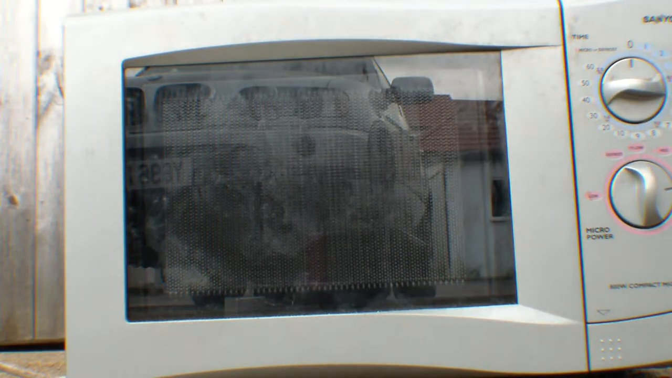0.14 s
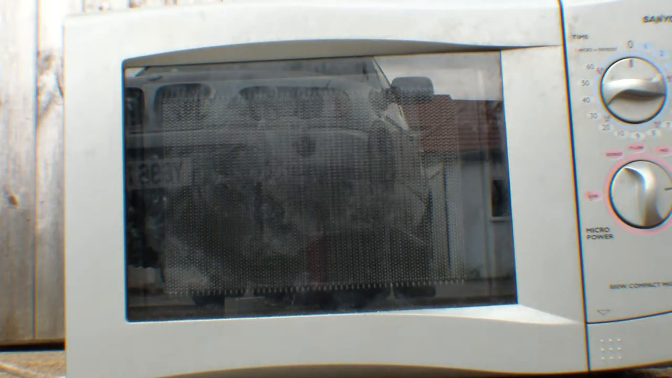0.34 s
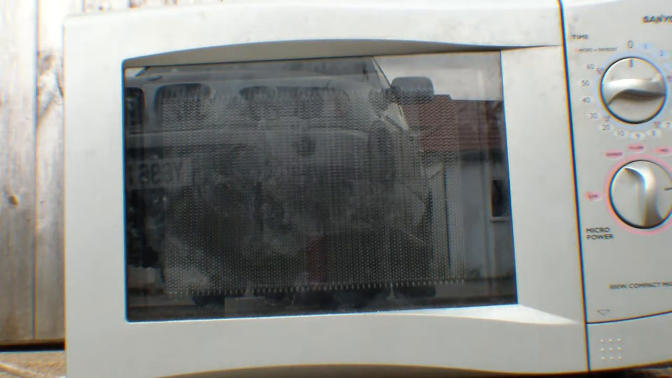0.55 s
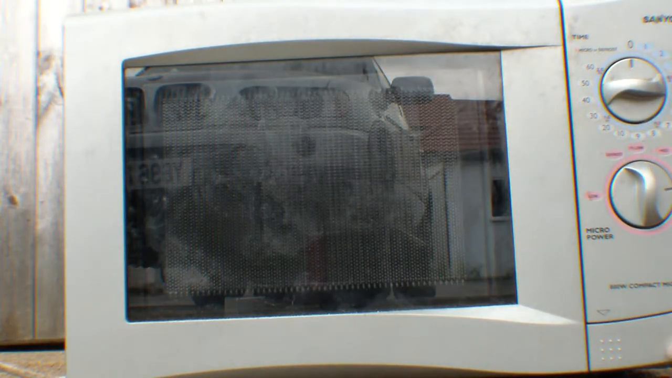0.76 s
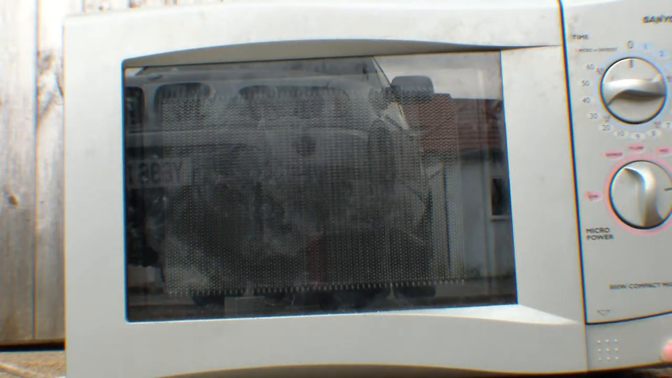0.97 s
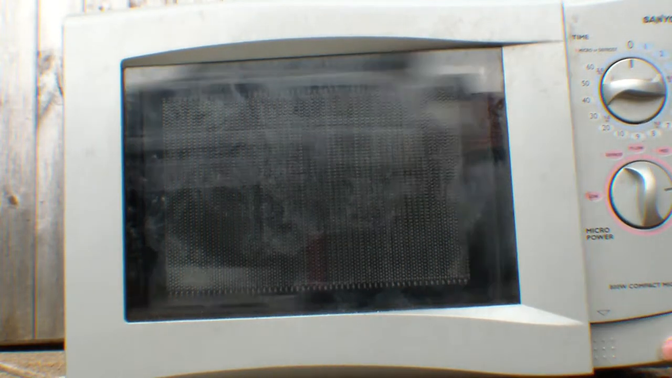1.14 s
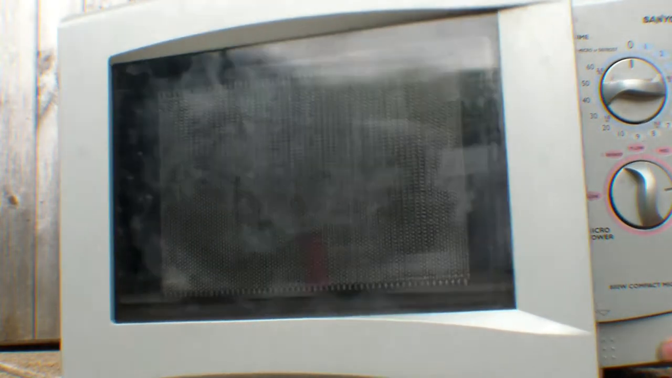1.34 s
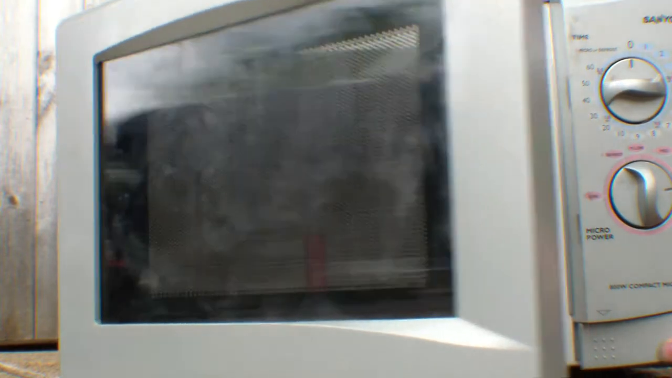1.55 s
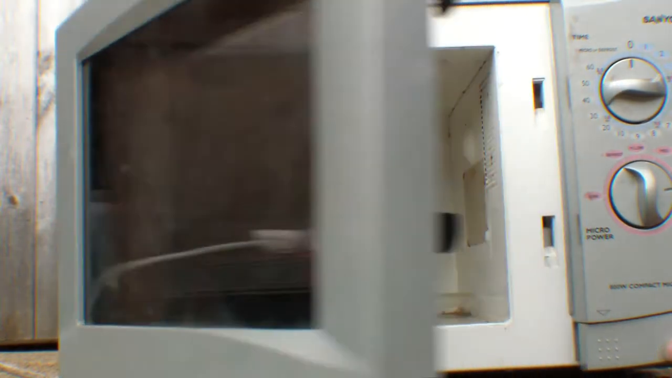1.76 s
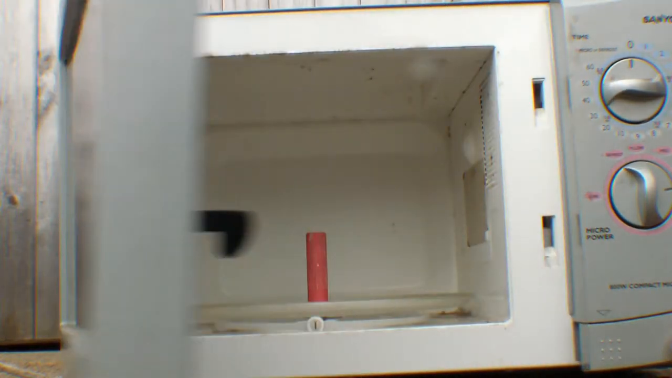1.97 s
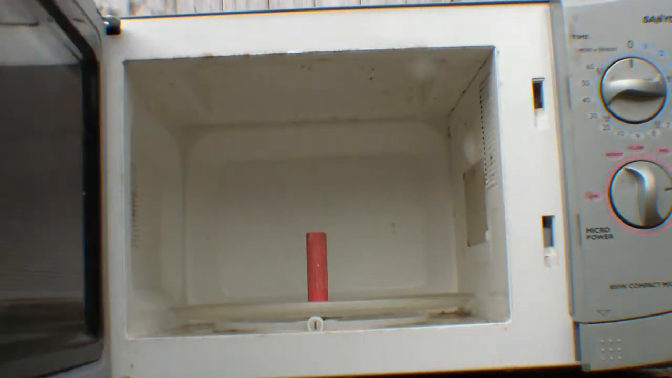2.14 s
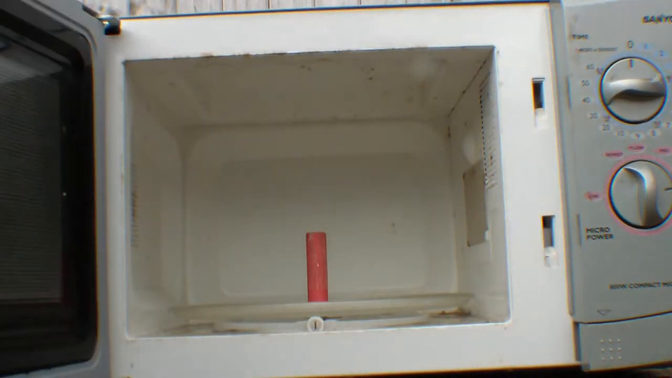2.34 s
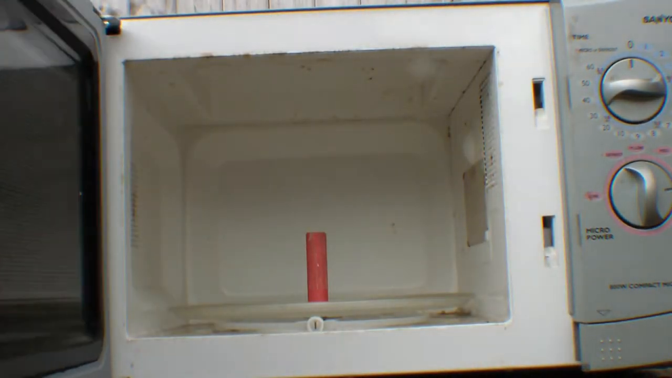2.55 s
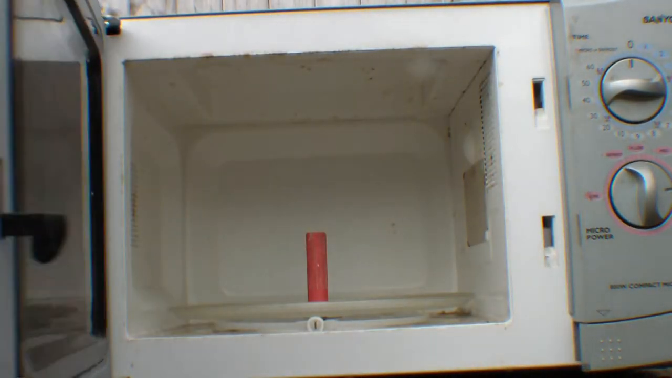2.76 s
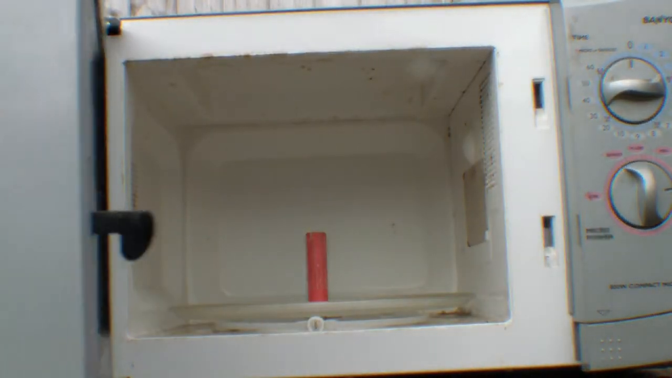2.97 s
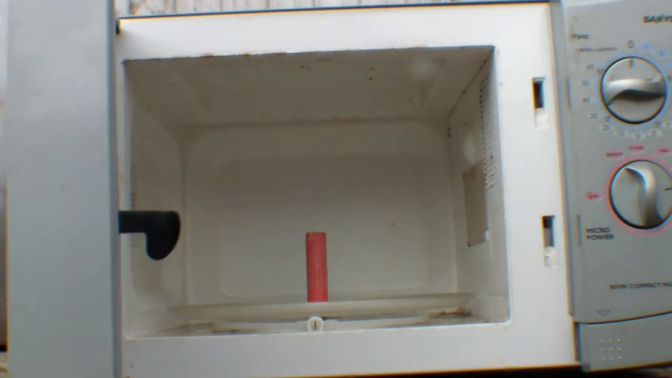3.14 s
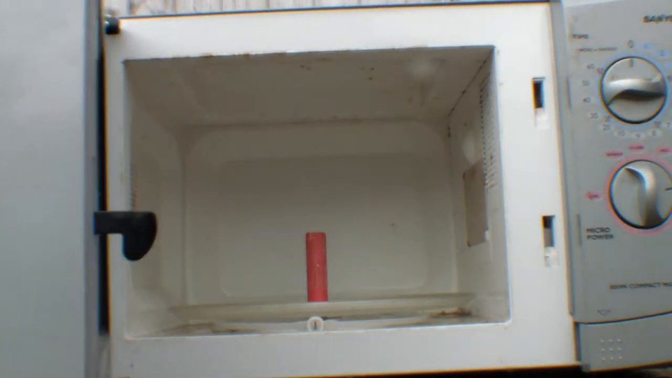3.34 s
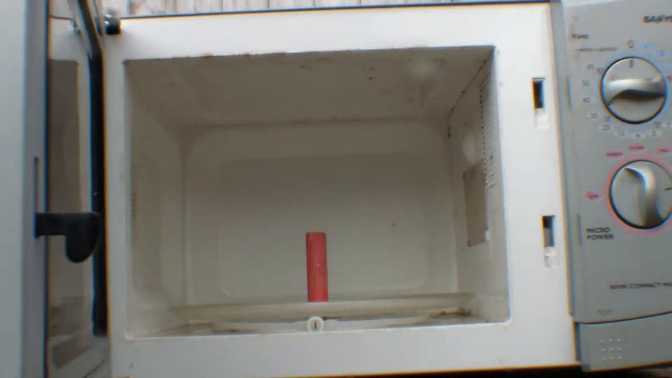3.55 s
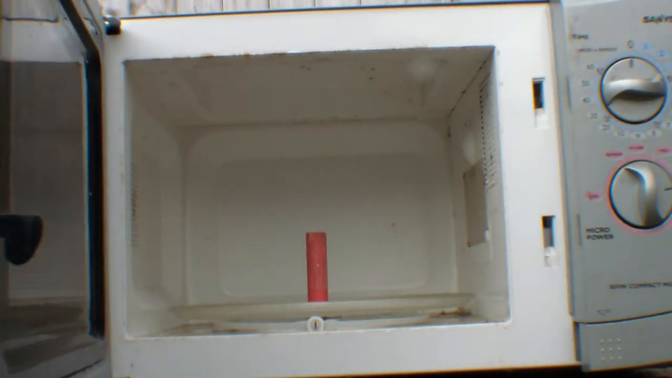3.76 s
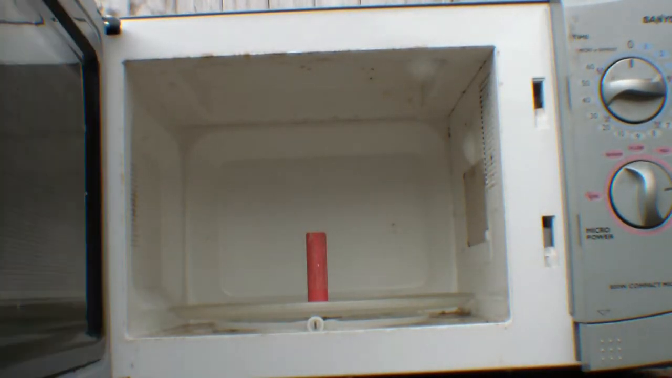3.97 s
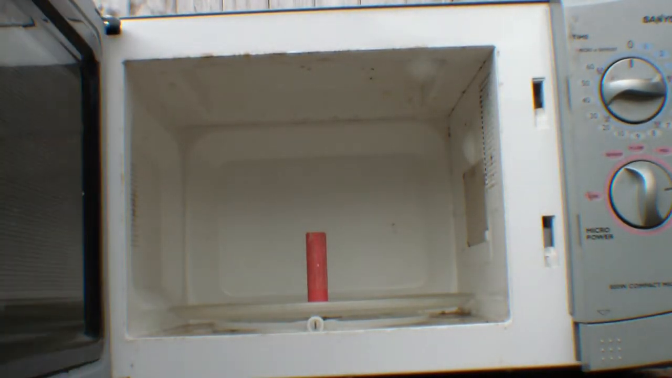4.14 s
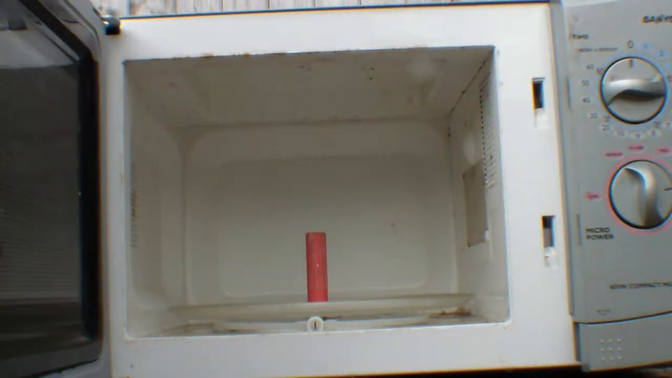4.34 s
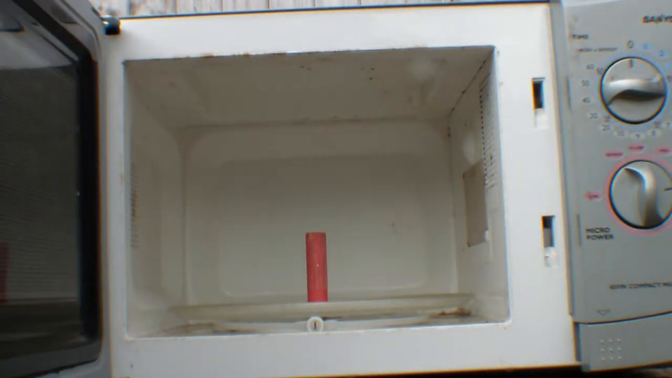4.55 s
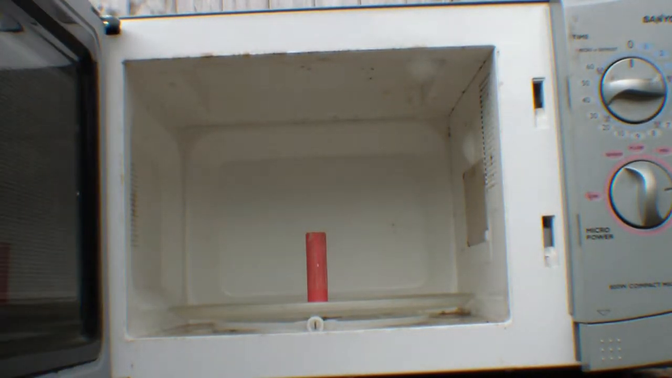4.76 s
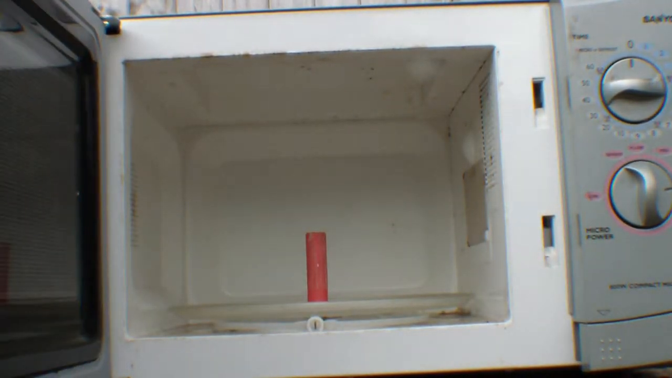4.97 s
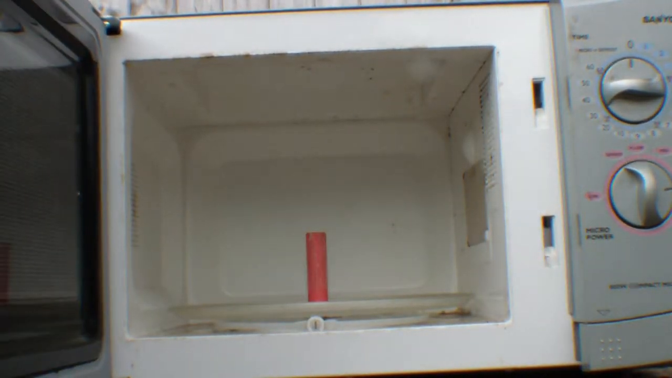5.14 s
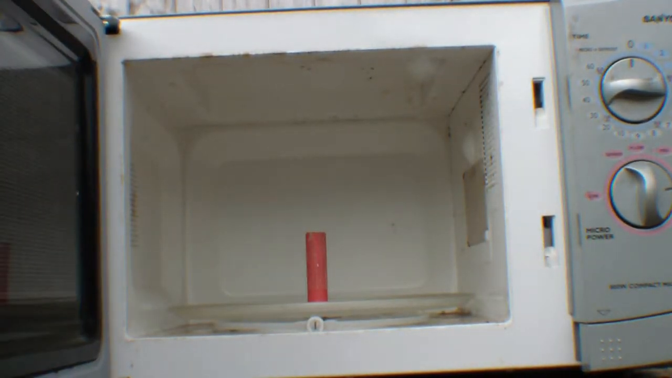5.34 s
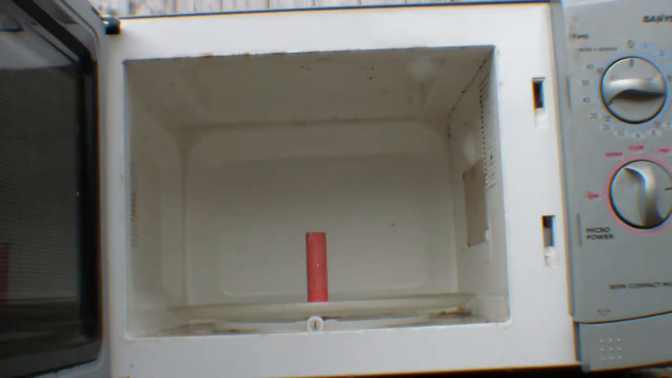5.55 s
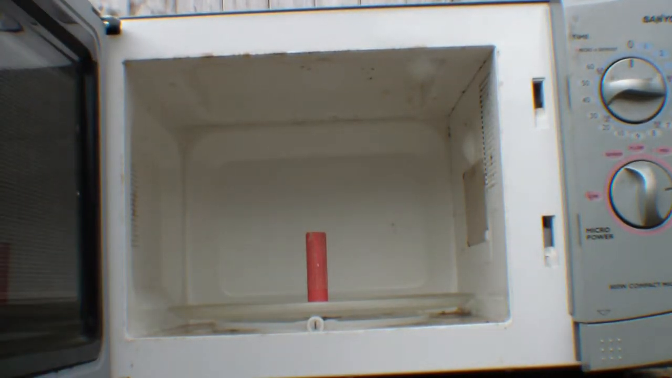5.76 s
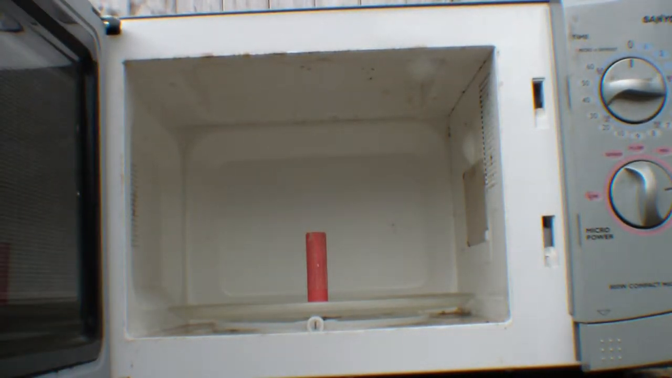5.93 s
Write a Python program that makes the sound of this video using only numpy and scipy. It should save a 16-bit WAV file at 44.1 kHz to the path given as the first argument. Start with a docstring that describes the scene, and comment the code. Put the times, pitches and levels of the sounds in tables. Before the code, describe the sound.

Close up in a yard, a brief gritty scuff leads into the clicks and loud clunk of a microwave door unlatching. Loose parts rattle lightly as it swings open and bumps to a stop. After one faint bird call, shoes shuffle softly on grit, snapping a few grains and squeaking once. A low, slowly throbbing machine hum and a soft wash of far traffic and wind continue underneath.

```python
"""A microwave oven is opened in a yard: a finger works the button, the latch hooks let go with a rattling
clunk, and the door swings out and thuds on its stop, each impact exciting modes of case, door and latch.
Someone shifts on gritty ground to the right, where grains crack and a sole squeaks. Two machines nearby
hum at almost the same pitch and beat, a bird calls once, and far traffic and wind fill the air."""
import sys
import numpy as np
from scipy import signal
from scipy.io import wavfile

SR = 44100
rng = np.random.default_rng(int(sys.argv[2]) if len(sys.argv) > 2 else 0)


def store_pcm(level_fs):
    """Save levels as 16-bit WAV."""
    pcm = np.round(np.clip(level_fs, -1, 1) * 32767).astype(np.int16)
    wavfile.write(sys.argv[1], SR, np.atleast_2d(pcm).T)


N = 268921


def oven():
    """Modal vibration: impacts and rattling parts drive damped resonances in five frequency bands."""
    # Impacts. Each row: start in seconds, level in dB, offsets for case, door panel and ticking parts
    # in dB, T60 of the jostling that follows in seconds.
    impacts = [(0.4907, -41.5, 8, -3, 4, 0.046), (0.5627, -18.5, -11.5, 1.5, -4, 0.042),
               (0.6632, -24, -15, -24, -12, 0.022), (0.6846, -20.5, -17, -6, -3.5, 0.027),
               (0.7967, -17.5, -9.5, -12, -3, 0.034), (0.8126, -9.5, -7, -2.5, -12.5, 0.039),
               (0.8392, -31, 1, -2, -25, 0.026), (0.8849, -29.5, 6, -9, -18, 0.02),
               (0.904, -25.5, -4, 2, -26, 0.019), (0.9329, -26, -6, 5.5, -19, 0.047),
               (0.9594, -24, 7, 9, -10, 0.016), (0.9865, -19, -6, -15, -2.5, 0.04),
               (1.092, -36, -10, -10, -8, 0.027), (1.1069, -9, -30, 3, -14, 0.017),
               (1.117, -13, -6, 5.5, -13, 0.11), (1.1298, -4, -2.5, -11.5, -14, 0.2),
               (1.1527, -2, -21, -8, -14, 0.048), (1.1605, -8.5, -5, 9.5, 0, 0.038),
               (1.177, -10.5, -4, -9, -8, 0.16), (1.212, -7.5, 5, 2.5, -2.5, 0.064),
               (1.2239, -17, -4, 3.5, -11, 0.092), (1.238, -24, 14.5, -9, -15, 0.034),
               (1.257, -20, 4, -6, -12, 0.045), (1.268, -21.5, 1, 0, -0.5, 0.1),
               (1.299, -28.5, -5, 6, -16, 0.097), (1.32, -33, 3, 0, -3, 0.052),
               (1.35, -25.5, 9, -2, -6, 0.029), (1.4192, -33.5, 16.5, 2, -4, 0.044),
               (1.499, -22, -9, 0, -20, 0.04), (1.6697, -38.5, -11, 10.5, -28, .033),
               (1.7534, -22, -13, -1, -37, 0.028), (1.772, -35, -12, -6, -11, 0.039),
               (1.802, -31.5, 1, 0, -13, 0.031), (1.84, -17.5, -22, -1, -15, 0.047),
               (1.8488, -11, -6, -3, -11, 0.019), (1.871, -47, -14, 13, -26, 0.042),
               (2.0388, -46, -16, -25, 10.5, 0.055), (2.337, -35.5, 14, 7, -18, 0.033),
               (2.3582, -32.5, -10, -18, -5, 0.073), (2.4213, -39, -1, 15.5, -5, 0.029),
               (2.449, -55, 7, -11, 17.5, 0.17), (2.5515, -35, 29.5, 9, -3, 0.13),
               (2.5662, -29.5, 16.5, 2, -3, 0.11), (2.5873, -24, 1, 1.5, -24, 0.024),
               (2.6217, -39.5, 22, 8, -6, 0.081), (2.66, -42, 25.5, -2, -8, 0.056),
               (2.695, -43, 18, 4, -15, 0.028)]
    # Loose parts shaking as button and door move. Each row: time in seconds, level in dB.
    rattle_curve = [(.45, -88), (.87, -58), (.956, -46.5), (1.085, -50), (1.6, -48), (1.72, -45.5),
                    (1.76, -39.5), (1.83, -49), (1.97, -50), (2.28, -49), (2.375, -41.5), (2.49, -42),
                    (2.55, -46.5), (2.72, -47), (2.9, -51), (3.0, -90)]
    # Modes of case, door and latch. Each row: frequency in Hz, gain in dB, T60 in seconds.
    modes = [(110, -12, 0.26), (151.7, -9.5, 0.17), (181.5, 0, 0.15), (237.1, -4.5, 0.19),
             (278.6, 2, 0.095), (327.2, -0.5, 0.14), (374.7, -2, 0.13), (453, -3, 0.088), (558, -3, 0.055),
             (666, 2, 0.04), (784, -4, 0.082), (866, -4.5, 0.045), (1056, -0.5, 0.02), (1284, 1.5, 0.012),
             (1559, -1, 0.024), (1710, -4.5, 0.023), (2006, -1, 0.013), (2320, -3, 0.013), (2720, 0, 0.009),
             (3118, 1, 0.01), (3850, -9, 0.017), (4160, -4, 0.016), (4630, -5.5, 0.018),
             (4950, -2.5, 0.0061), (6090, -0.5, 0.0054), (6700, -8, 0.014), (7150, -12, 0.0063),
             (8400, 4.5, 0.0038), (10400, 3, 0.0028), (12200, -1, 0.004), (13800, -9, 0.003)]
    # Rattle in each band below. Each row: offset from the rattle curve in dB, aftershake relative to
    # each impact in dB, T60 of the aftershake in seconds.
    shake = [(9, -6.5, 0.32), (2.5, -10, .3), (-2, -26.5, 0.3), (-10, -27, 0.26), (-23, -28.5, 0.13)]
    start_s, db, case_db, panel_db, ticks_db, jostle_t60 = np.transpose(impacts)
    # Each row: impact levels in dB, lower and upper edge in Hz, drive in dB, stereo width, clack in dB.
    bands = [(db + case_db, 0, 350, -36, .03, 20),   # case
             (db + panel_db, 350, 1200, -31, .06, 21),   # door panel
             (db, 1200, 4000, -25, .2, 14),   # latch
             (db + ticks_db, 4000, 8000, -22, .6, 12),   # small ticking parts
             (db + ticks_db - 20.5, 8000, 15000, -13, 1.3, 6)]   # their crisp edge
    onset_db, spot_spread_db = 16, 2.2
    n = round(3.4 * SR)   # the oven is at rest by then
    curve_db, = curves(rattle_curve)
    latest_impact = np.searchsorted(np.sort(start_s) * SR, np.arange(n), side="right")
    out = np.zeros((2, N))
    for band, (rattle_db, after_db, after_t60) in zip(bands, shake):
        impact_db, low, high, drive_db, width, clack_db = band
        jostle, onsets = bursts(start_s, impact_db, jostle_t60, onset_db, rise_s=.0015)
        contacts = grains(5000, 2.56, size=n) + width * grains(5000, 6.9, size=n) * [[1], [-1]]
        blows = amp(drive_db) * (jostle[:n] * contacts + onsets[:n])
        aftershake = amp(after_db - onset_db) * decay(onsets[:n], after_t60)
        rattle = amp(drive_db) * (amp(curve_db[:n] + rattle_db) + aftershake) * contacts + 1e-18
        # Plastic clacks without a pitch: the force itself, limited to the band.
        clack = bandpass(blows + amp(6) * rattle, max(low, 120), high)
        out[:, :n] += amp(clack_db) * clack
        for k, (hz, mode_db, t60) in enumerate(modes):
            if low <= hz < high:
                r, w = amp(-60 / (t60 * SR)), 2 * np.pi * hz / SR
                # Each blow lands elsewhere and so excites the mode more or less.
                coupling = amp(spot_spread_db * rng.standard_normal(len(start_s) + 1))[latest_impact]
                force = coupling * blows + rattle
                ring = signal.lfilter([0, amp(mode_db) * np.sin(w)], [1, -2 * r * np.cos(w), r * r], force)
                out[:, :n] += (-1) ** k * ring
    return out


def grit():
    """Granular noise: grains crack and rub underfoot, and their impulses excite broad resonances."""
    # Cracking grains. Each row: start in seconds, level in dB, hollow and bright offsets in dB,
    # T60 of the crunch in seconds.
    cracks = [(0.0474, -41.5, 5, -13, 0.035), (0.0843, -25, -10, -28, .02), (0.1664, -34, -18, -22, 0.039),
              (4.1964, -42, -8, -18, 0.066), (4.2192, -36, 1, -18, 0.075), (4.255, -34, -3, -22, .035),
              (4.2883, -38, -7, -22, .035), (4.58, -36, -11, -4, 0.051), (4.655, -24, -8, -8, .03),
              (4.663, -2.5, 2.5, -7.5, 0.017), (4.6742, -14, -9, -15, 0.027), (4.7516, -35, -6, -21, 0.066),
              (4.8422, -30.5, -1, -7, 0.049), (4.8538, -23, -20, -2, 0.023),
              (5.2544, -7.5, -4.5, -8.5, 0.012), (5.318, -31.5, -2, -6, 0.038), (5.3406, -36, 2, -15, .04),
              (5.4316, -36, 5.5, -11, 0.021), (5.452, -38, 4, -14, .04), (5.499, -25, -5, -10, 0.049),
              (5.5157, -18, -2, -4, 0.016), (6.0252, -26, -2.5, -10, 0.033), (6.047, -13, -11, -9, .01),
              (6.052, -24, 5, -15, 0.018), (6.0857, -11, -6, -5, 0.02)]
    # Two spells of shuffling. Each row: time in seconds, level in dB, bright offset in dB.
    shuffles = [
        [(0.0, -38.5, -4.5), (.13, -42.5, -4.5), (.29, -40.5, -5.5), (.5, -43.5, -4.5), (.55, -53, -2)],
        [(4.08, -63, 0), (4.25, -36.5, -4.5), (4.32, -48, -10), (4.64, -50.5, -2), (4.73, -39.5, -5),
         (4.84, -42.5, -5), (4.89, -47, -6), (5.26, -49, -4), (5.3, -45, -5.5), (5.49, -35, -8),
         (5.55, -52.5, -7), (5.75, -44.5, -4.5), (5.97, -38.5, -3.5), (6.09, -23, -6.5)],
    ]
    # Resonances of the grit. Each row: frequency in Hz, bandwidth in Hz, gain in dB.
    modes = [(960, 1100, 1.5), (1970, 440, 10), (2870, 1780, 3.5), (4300, 2600, 5.5), (5600, 6900, 6.5),
             (7640, 4400, -4)]
    start_s, db, hollow_db, bright_db, crunch_t60 = np.transpose(cracks)
    rub_db, rub_bright_db = spells(shuffles)
    bands = [(db + hollow_db, rub_db - 8, modes[:2]),
             (db, rub_db, modes[2:4]),
             (db + bright_db, rub_db + rub_bright_db, modes[4:])]
    snap_db, settle_db = 13, -24
    crunch = grains(6000, 4)
    shared_scuff, *own_scuff = [grains(6000, .71) for _ in range(3)]
    out = np.zeros((2, N))
    for crack_db, shuffle_db, band_modes in bands:
        for channel, side in enumerate((-1, 1)):   # a little louder on the right
            swell, snaps = bursts(start_s, crack_db + .9 * side, crunch_t60, snap_db, rise_s=.0024)
            shuffling = amp(shuffle_db + 4 + .36 * side)
            settling = amp(settle_db - snap_db) * decay(snaps, t60=.079)
            scuff = .48 * shared_scuff + .52 * own_scuff[channel]
            force = amp(3) * (swell * crunch + snaps) + (shuffling + settling) * scuff + 1e-18
            for k, (hz, width_hz, mode_db) in enumerate(band_modes):
                r, w = np.exp(-np.pi * width_hz / SR), 2 * np.pi * hz / SR
                b = amp(mode_db) * (1 - r * r) / 2 * np.array([1, 0, -1])
                out[channel] += (-1) ** k * signal.lfilter(b, [1, -2 * r * np.cos(w), r * r], force)
    return bandpass(out, 750, 13500, order=3)


def squeak():
    """Friction: a slipping sole gives one short falling tone on the right."""
    # The slip. Each row: time in seconds, frequency in Hz, level in dB.
    slip = [(5.038, 2300, -75), (5.045, 2190, -42), (5.055, 1790, -42), (5.066, 1850, -68)]
    return glide(slip) * amp([[-1.5], [1.5]])


def hum():
    """Beating: the tones of two machines interfere, along with weak overtones and two thin whines."""
    # Beat minima. Each row: time in seconds, upper frequency in Hz, upper and lower tone levels in dB.
    minima = [(-.15, 97.9, -27, -19), (.14, 96.6, -34.5, -55), (.4, 96.63, -33.5, -32),
              (1.08, 96.47, -39, -33.5), (1.77, 97.35, -36, -32.5), (2.47, 97.25, -32, -32),
              (3.22, 95.85, -31.5, -36.5), (4.05, 97.9, -31.5, -37), (4.75, 97.25, -30, -34),
              (5.42, 97.9, -34.5, -30), (6.3, 96.2, -23, -79)]
    # Weak partials. Each row: frequency as a multiple of the upper tone, level in dB.
    overtones = [(4 / 3, -51), (2.1, -54.5)]
    # High steady pitches. Each row: frequency in Hz, level in dB, start in seconds, waver in dB.
    whines = [(12645, -67, 2.55, 3.5), (13151, -66, 1, 1.5)]
    hz, upper_db, lower_db = curves(minima)
    # The lower tone falls one cycle behind from row to row and is in antiphase at each.
    lag_cycles, = curves([(row[0], k + .5) for k, row in enumerate(minima)])
    phase = 2 * np.pi * np.cumsum(hz) / SR
    tones = amp(upper_db) * np.sin(phase) + amp(lower_db) * np.sin(phase - 2 * np.pi * lag_cycles)
    tones += sum(amp(db + 2.5 * drift(2.5)) * np.sin(ratio * phase) for ratio, db in overtones)
    t = np.arange(N) / SR
    whine = sum(amp(db + waver_db * drift(3.8)) * np.sin(2 * np.pi * whine_hz * t) * (t >= start_s)
                for whine_hz, db, start_s, waver_db in whines)
    return np.sqrt(2) * (tones * amp([[-.6], [.6]]) + whine * [[1], [.3]])


def bird():
    """Frequency modulation: a far bird calls with one pure tone that slides downward."""
    # The call. Each row: time in seconds, frequency in Hz, level in dB.
    call = [(3.285, 4520, -99), (3.295, 4330, -46.5), (3.34, 4150, -59), (3.385, 4120, -52),
            (3.40, 4000, -58), (3.44, 4100, -73)]
    return glide(call)


def air():
    """Partly coherent noise: far traffic and wind in wavering half-octave bands, wider in the treble."""
    # Background spectrum. Each row: frequency in Hz, relative spectral density in dB.
    spectrum = [(20, -42), (35, -15), (60, -20), (130, -21), (200, -24.5), (320, -25.5), (620, -28),
                (1100, -33.5), (1600, -41), (3500, -44), (7000, -50), (13000, -50.5), (15800, -54)]
    # Likeness of left and right. Each row: frequency in Hz, correlation coefficient.
    coherence = [(30, 0.91), (100, 0.95), (500, 0.98), (1500, 0.84), (4000, 0.36), (10000, 0.022)]
    level_db, waver_db = -39, 1.7
    edges = 20 * 2 ** np.arange(0, 10.1, .5)
    shared_drift = drift(1.5)
    white = rng.standard_normal((2, 2, N))
    out = np.zeros((2, N))
    for k, (low, high) in enumerate(zip(edges, edges[1:])):
        mid, side = bandpass(white[k % 2], low, high)
        hz = np.sqrt(low * high)
        alike = at_hz(coherence, hz)
        gain = amp(at_hz(spectrum, hz) + waver_db * (.6 * shared_drift + drift(3.1)))
        out += gain * (np.sqrt(1 + alike) * mid + np.sqrt(1 - alike) * side * [[1], [-1]])
    return amp(level_db) * rms_one(out) * amp([[-.4], [.4]])


def yard(source):
    """Diffuse reflection: walls and ground return a short, dull tail of the source."""
    t60, gap_s, dull_hz = .098, .01, 6150
    age = np.arange(SR // 4) / SR
    mid, side = rng.standard_normal((2, len(age))) * amp(-60 * age / t60) * (age > gap_s)
    side = signal.lfilter(*signal.butter(1, 2500, "high", fs=SR), side)   # close ports differ in treble
    tail = signal.lfilter(*signal.butter(1, dull_hz, fs=SR), mid + .6 * side * [[1], [-1]])
    tail /= np.sqrt(np.sum(tail ** 2) / 2)
    return signal.fftconvolve(source.mean(axis=0)[None], tail, axes=1)[:, :N]


def bursts(starts_s, levels_db, t60s, onset_db, rise_s):
    """Transients: envelopes that rise and decay exponentially, and an impulse at the onset of each."""
    envelope, onsets = np.zeros((2, N))
    age = np.arange(SR // 6) / SR
    for start_s, db, t60 in zip(starts_s, levels_db, t60s):
        i = round(start_s * SR)
        burst = amp(db - 60 * age / t60) * np.minimum(age / rise_s, 1)
        envelope[i:i + len(age)] += burst[:N - i]
        onsets[i] += amp(db + onset_db)
    return envelope, onsets


def decay(impulses, t60):
    """Exponential decay: an envelope that falls 60 dB in t60 seconds after each impulse."""
    return signal.lfilter([1], [1, -amp(-60 / (t60 * SR))], impulses + 1e-18)


def grains(per_s, spread_db, size=N):
    """Shot noise: random clicks of uneven size, at unit RMS."""
    sizes = amp(spread_db * np.minimum(rng.exponential(1, size), 4)) * rng.choice([-1, 1], size)
    return rms_one(sizes * (rng.random(size) < per_s / SR))


def glide(rows):
    """Phase as the integral of frequency: a sine that follows a pitch and level contour."""
    start = round(rows[0][0] * SR)
    span = slice(start, start + round((rows[-1][0] - rows[0][0]) * SR))
    hz, db = curves(rows)
    out = np.zeros(N)
    out[span] = amp(db[span]) * np.sqrt(2) * np.sin(2 * np.pi * np.cumsum(hz[span]) / SR)
    return out


def drift(rate_hz):
    """Low-passed noise: a slow random fluctuation at unit RMS."""
    step, run_in = 40, 2000
    r = np.exp(-2 * np.pi * rate_hz * step / SR)
    noise = rng.standard_normal(N // step + run_in + 2)
    slow = signal.lfilter([1], [1, -2 * r, r * r], noise)[run_in:]
    return np.interp(np.arange(N) / step, np.arange(len(slow)), rms_one(slow))


def curves(rows):
    """Linear interpolation of timed rows: each column after the first, one value a sample."""
    times, *columns = np.transpose(rows)
    return [np.interp(np.arange(N) / SR, times, column) for column in columns]


def spells(tables):
    """Gating: curves joined in time, with the level down at -99 dB between them."""
    rows = []
    for table in tables:
        first, last = table[0], table[-1]
        rows += [(first[0] - .01, -99, *first[2:]), *table, (last[0] + .004, -99, *last[2:])]
    return curves(rows)


def at_hz(points, hz):
    """Interpolation of a spectrum on a logarithmic frequency axis."""
    frequencies, values = np.transpose(points)
    return np.interp(np.log(hz), np.log(frequencies), values)


def bandpass(x, low_hz, high_hz, order=2):
    """Maximally flat band-pass filter."""
    return signal.sosfilt(signal.butter(order, [low_hz, high_hz], "band", fs=SR, output="sos"), x)


def amp(db):
    """Decibels to amplitude ratio."""
    return 10 ** (np.asarray(db) / 20)


def rms_one(x):
    """Normalisation to unit RMS."""
    return x / np.sqrt(np.mean(x ** 2) + 1e-20)


def scene():
    """Superposition: direct and scattered sound add at the two microphone ports."""
    door = oven()
    feet = grit() + squeak()
    from_right = feet + hum() + air()
    from_right[0] = np.roll(from_right[0], 2)   # reaches the left port two samples later
    scatter = amp(-12) * yard(door) + amp(-15) * yard(feet)
    return door * amp([[.1], [-.1]]) + from_right + scatter + bird()


def record(dry):
    """Saturation and band limiting: the loudest clunks overload softly, and the top is cut at 16 kHz."""
    saturated = dry / (1 + np.abs(dry) ** 4) ** .25
    lowpass = signal.cheby2(16, 50, 16000, fs=SR, output="sos")
    return np.clip(signal.sosfilt(lowpass, saturated), -1, 1)


dry = scene()
out = record(dry)
store_pcm(out)
```